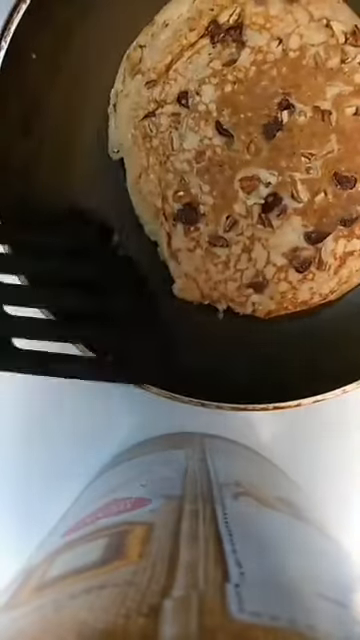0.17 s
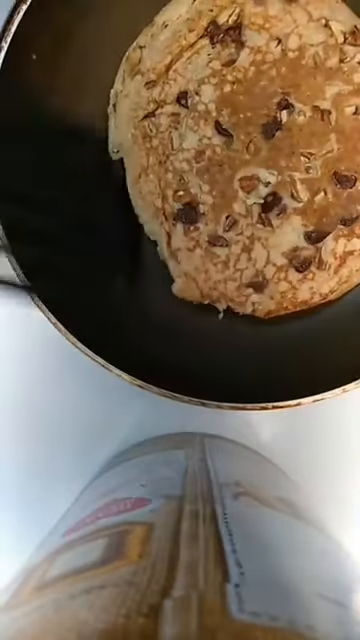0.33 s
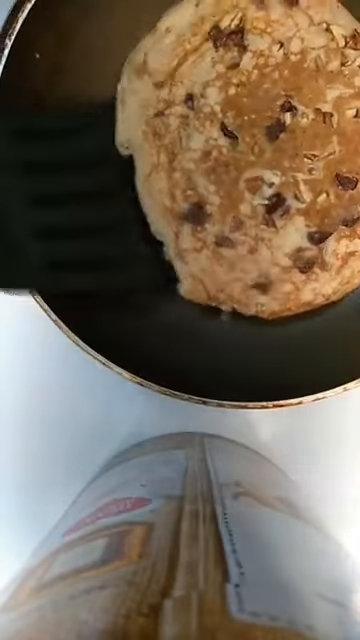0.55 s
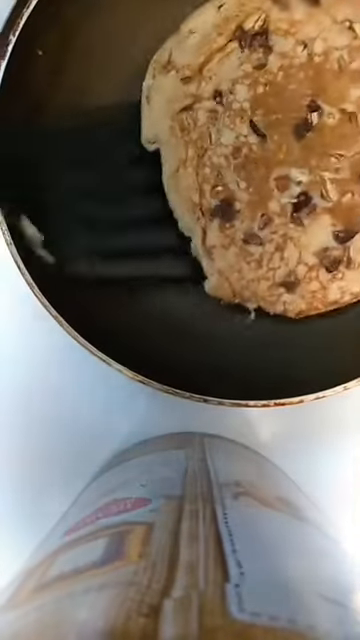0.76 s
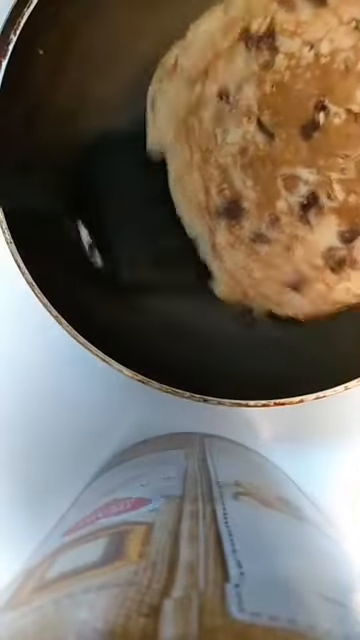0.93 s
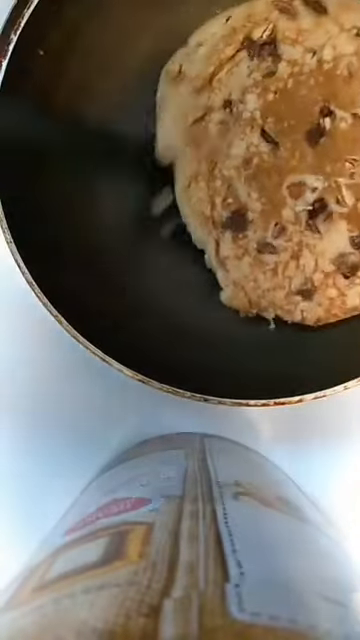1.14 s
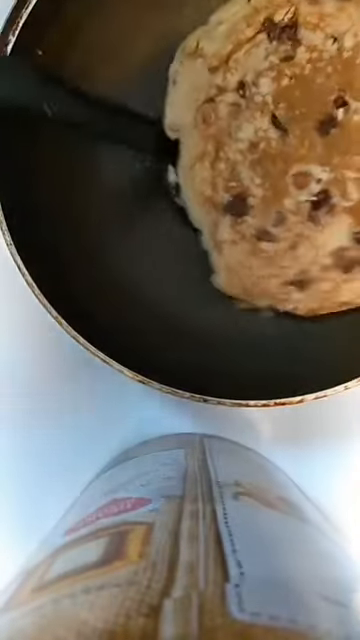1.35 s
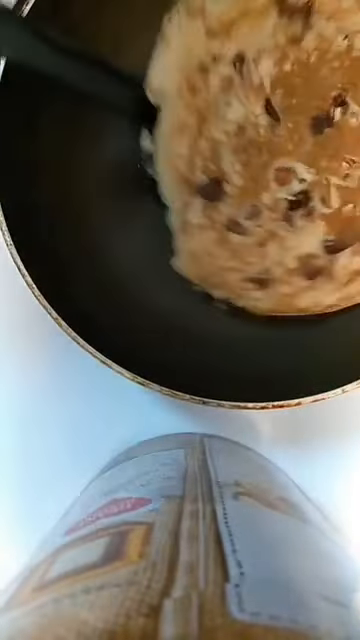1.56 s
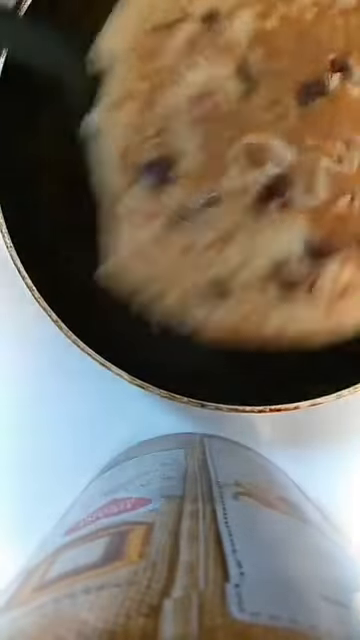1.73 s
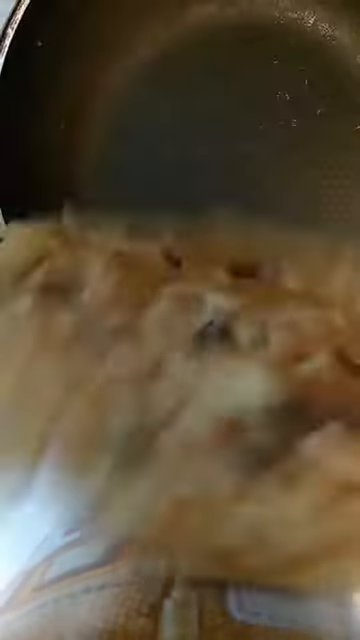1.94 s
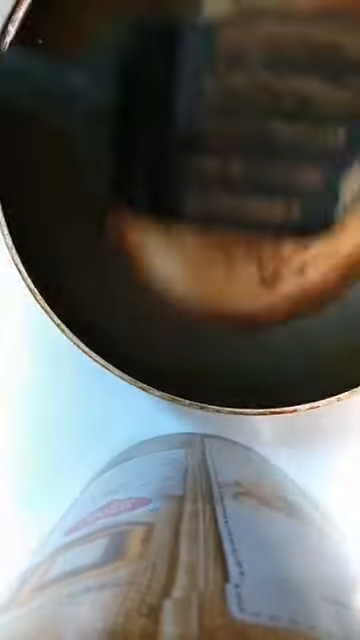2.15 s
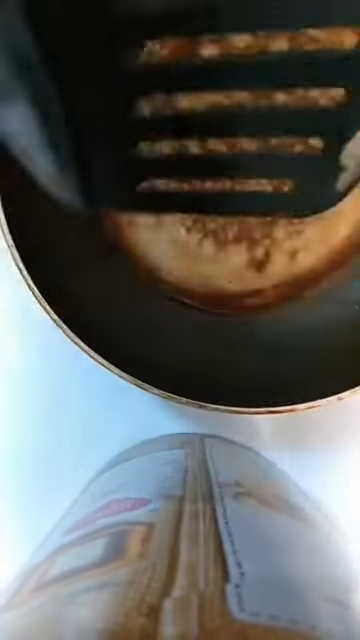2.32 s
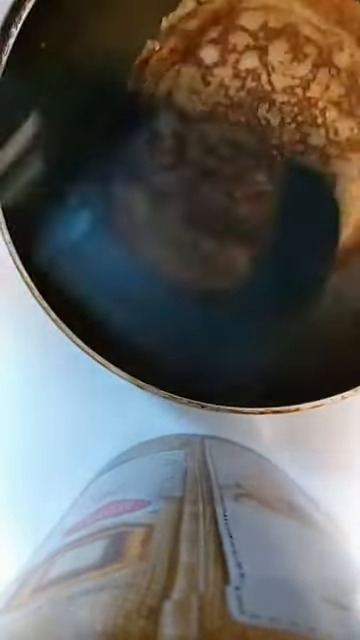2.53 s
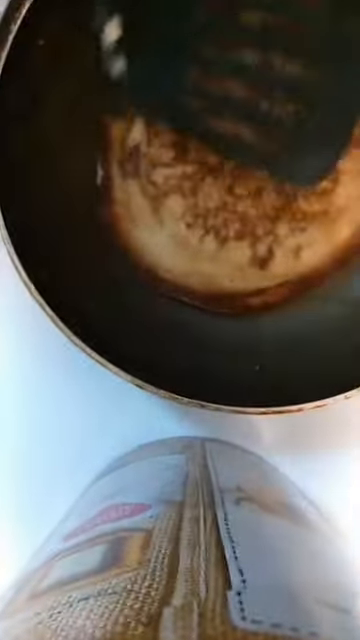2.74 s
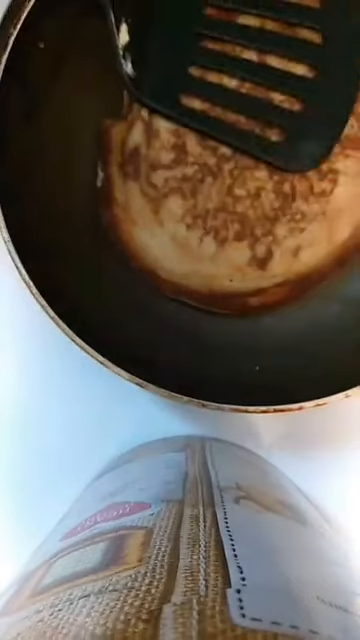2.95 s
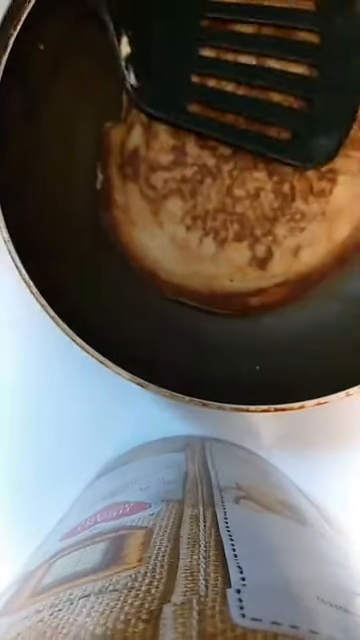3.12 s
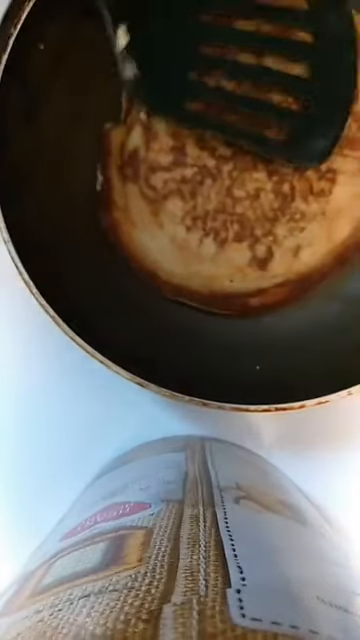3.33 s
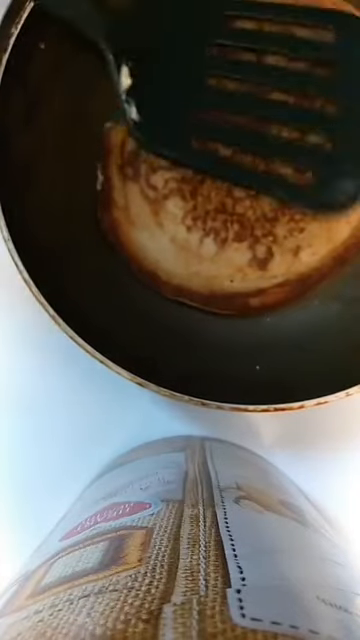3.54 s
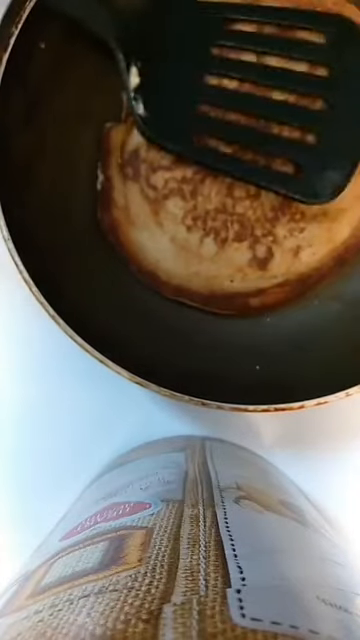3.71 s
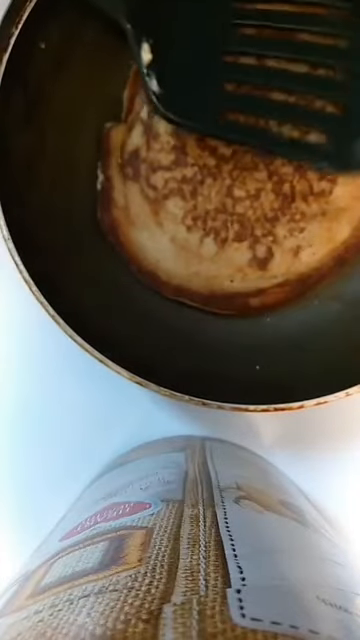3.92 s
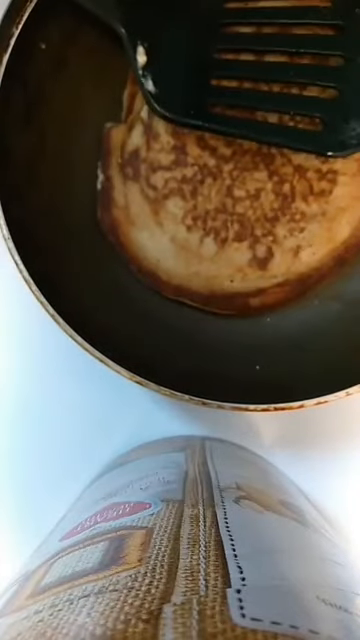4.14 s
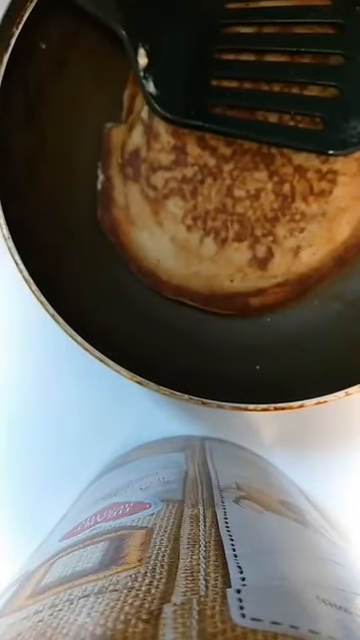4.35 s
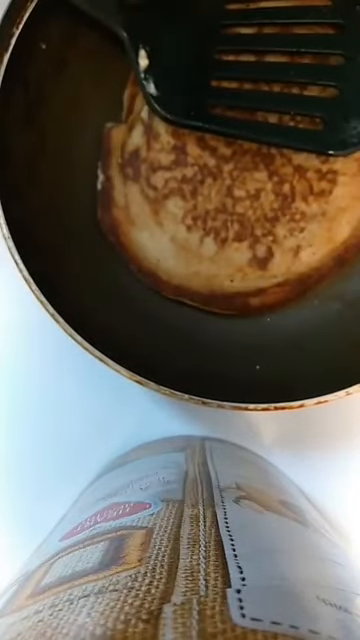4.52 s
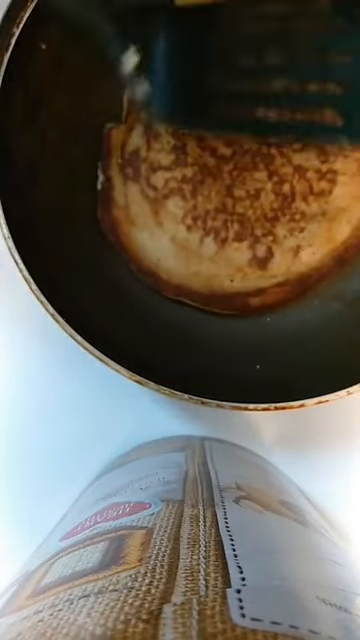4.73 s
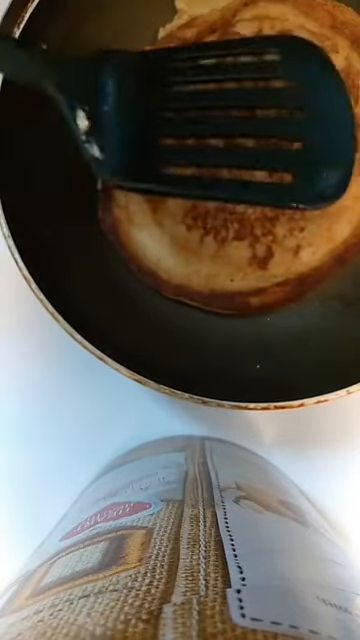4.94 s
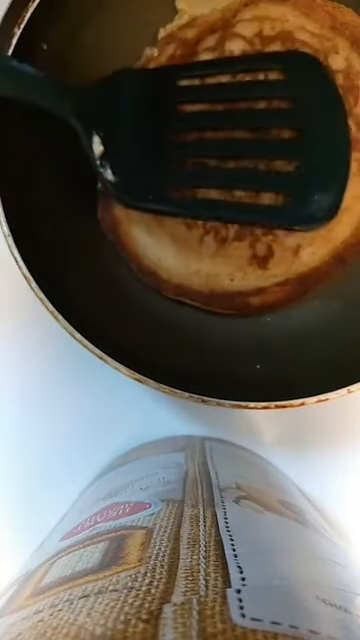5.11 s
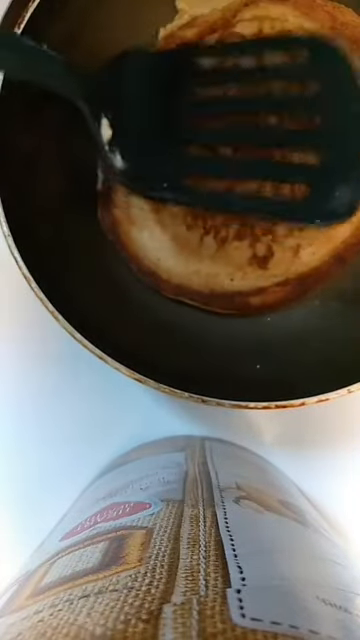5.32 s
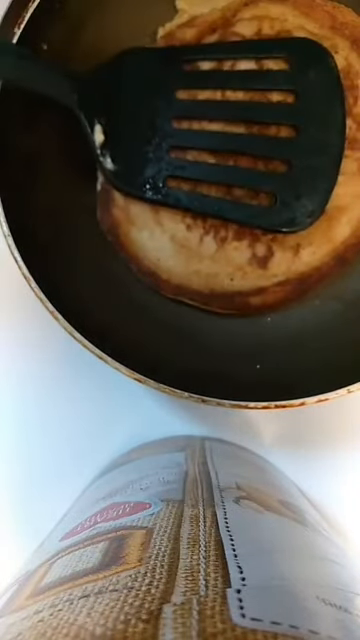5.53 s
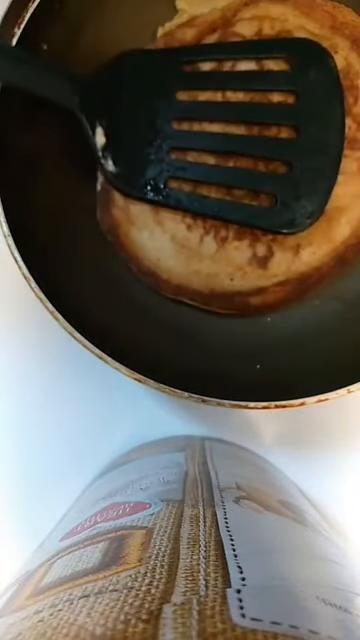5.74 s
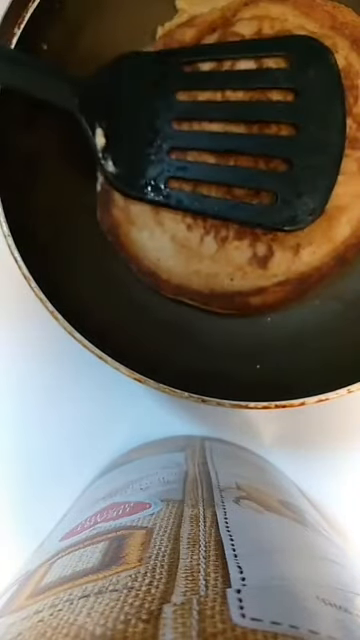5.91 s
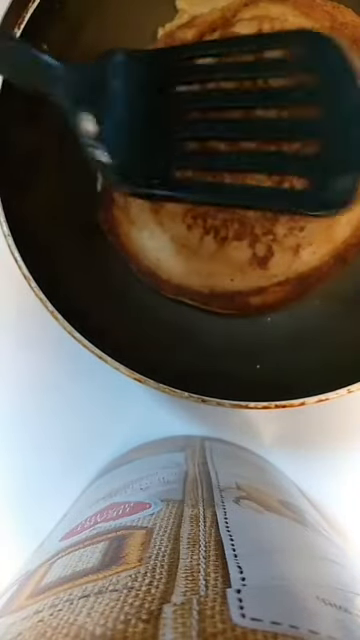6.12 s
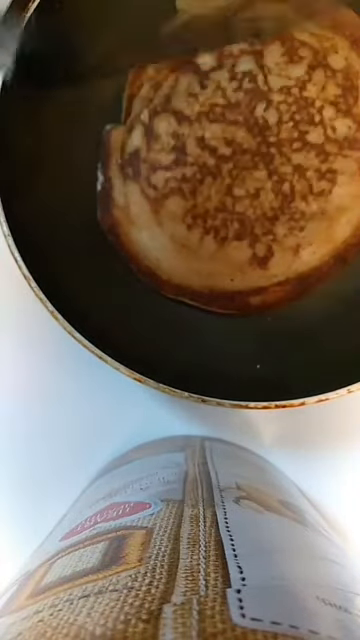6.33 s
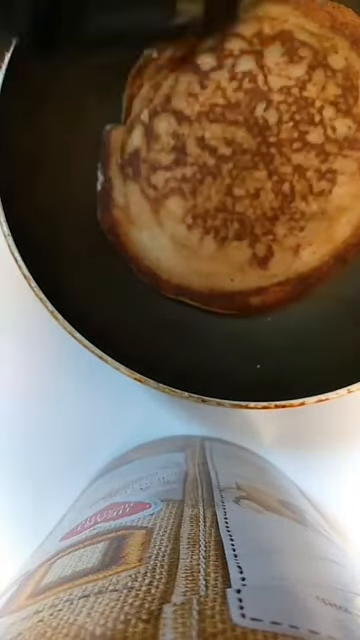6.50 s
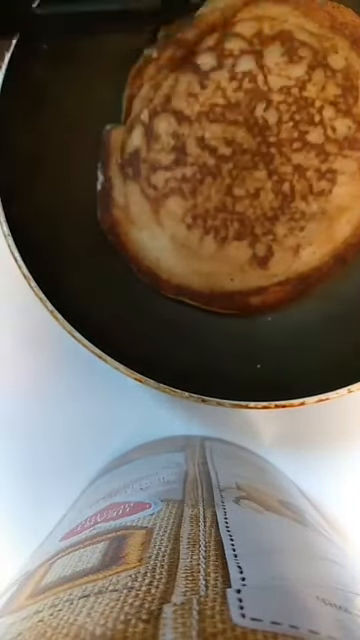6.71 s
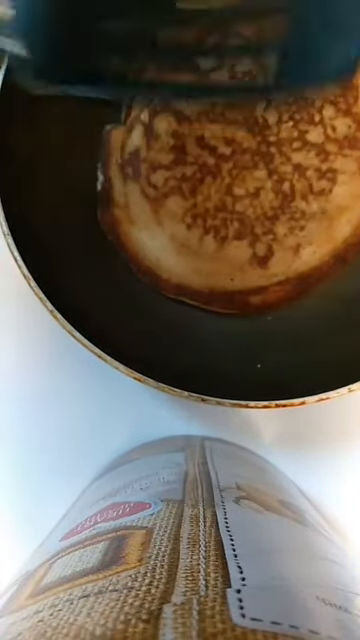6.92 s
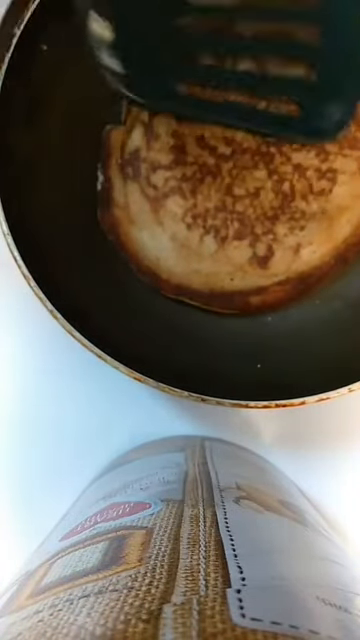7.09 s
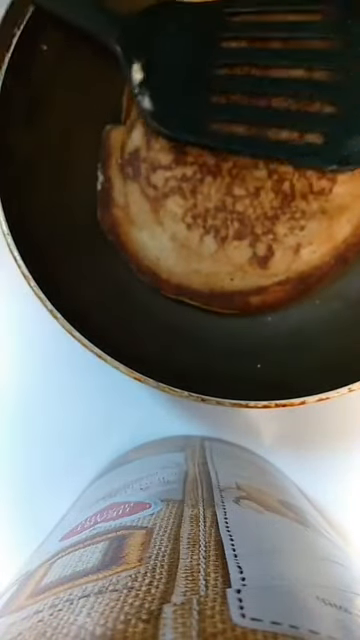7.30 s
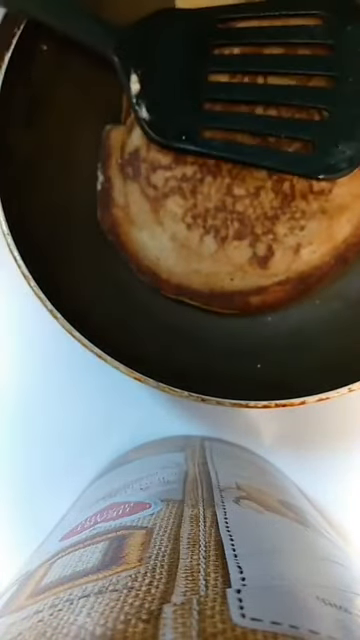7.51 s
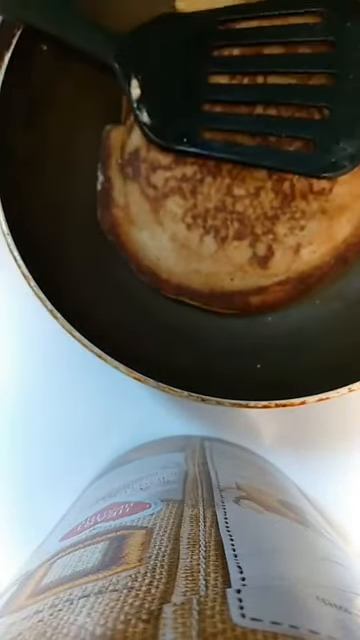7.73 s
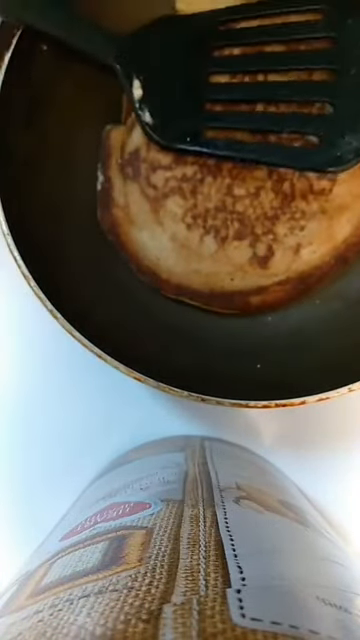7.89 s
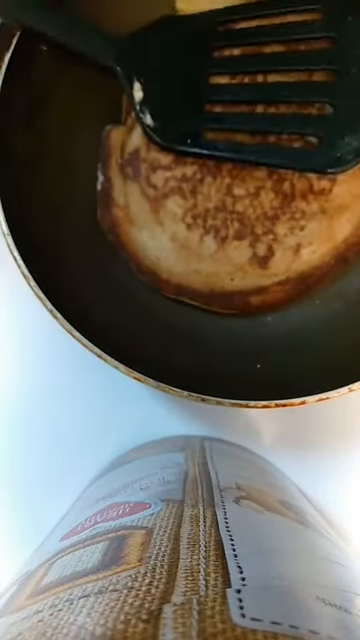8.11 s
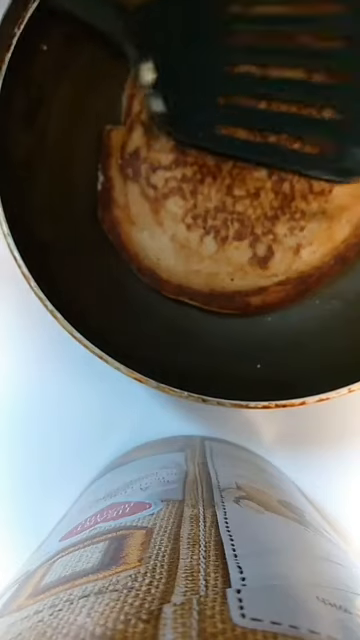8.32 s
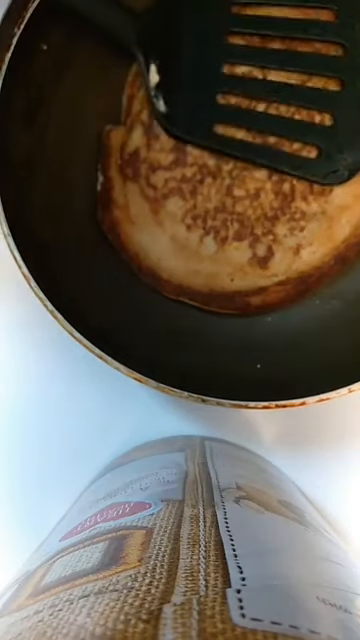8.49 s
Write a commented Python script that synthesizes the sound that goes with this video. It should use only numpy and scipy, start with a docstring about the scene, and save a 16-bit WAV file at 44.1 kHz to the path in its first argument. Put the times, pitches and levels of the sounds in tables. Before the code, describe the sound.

A small kitchen, heard close to a frying pan, with faint appliance hum, soft low rumble and a very short room tail. From 0 to 1.3 s a plastic blade scrapes in short rough strokes over thin, bright sizzling, with knocks at the start, near 0.25 and 0.7 s, and tiny squeaks near 0.2, 0.85 and 1.1 s. It quietens; a sharp spit at 1.5 s, a swelling scrape at 1.9 s and a quick chirp at 2.15 s lead to the flip. At 2.2 s several hard slaps and cracks bunch together with loud spatter, followed by smaller knocks until 2.5 s. Crisp pops and hissing stay busy, with a brief steam puff around 4 s. After 5 s the crackling thins to separate ticks, while soft, blurred woody bumps sound around 5.1, 5.8, 6.2, 6.7, 7.4 and 8.5 s.

```python
"""A plastic spatula slides under a pancake, flips it into a frying pan and presses it down in a small kitchen.
First the blade scrapes, squeaks and knocks: dense slips and rough blows drive the modes of the pan.
At 2.2 s come the hardest blows and loudest spits: clicks, pops and sprays of noise over the fizz of the fat.
A jet of steam at 4 s is band noise; from 5 s dull bumps ring across the room as blurred modes and clear notes.
Throughout, narrow noise bands make an appliance hum over a low, patchy rumble, and a short noise tail is the room."""
import sys
import numpy as np
from scipy import signal
from scipy.fft import rfft, irfft, next_fast_len
from scipy.io import wavfile

SR = 44100
rng = np.random.default_rng(int(sys.argv[2]) if len(sys.argv) > 2 else 0)


def put_to_file(sound):
    """Save the sound as 16-bit audio at rate SR, in the file named by the first command-line argument."""
    columns = np.atleast_2d(sound).T  # one column per channel
    safe = np.clip(columns, -1, 1)
    whole_steps = np.round(safe * 32767)
    wavfile.write(sys.argv[1], SR, whole_steps.astype(np.int16))


N = 377319

# Steady frying: time_s, fizz_db, steam_db
FRYING_LEVELS = [(0.0, -65.5, -77), (0.31, -58.5, -62.5), (0.62, -61, -70.5), (.95, -58.5, -63.5),
                 (1.12, -53.5, -57), (1.19, -55, -60.5), (1.25, -61, -66), (1.44, -57, -68.5),
                 (1.64, -66.5, -78.5), (1.95, -62.5, -80), (2.1, -58.5, -69), (2.21, -40, -38.5),
                 (2.31, -53, -56), (2.66, -57, -69), (2.97, -55, -60), (3.22, -54, -57.5),
                 (3.55, -60.5, -76), (3.86, -65.5, -70.5), (3.95, -50.5, -62), (4.12, -56, -62),
                 (4.26, -57.5, -64), (5.17, -61.5, -67.5), (5.6, -63.5, -72), (5.97, -57.5, -63.5),
                 (6.42, -63.5, -72.5), (6.82, -58.5, -71), (7.1, -64.5, -76), (8.05, -61, -70),
                 (8.556, -63.5, -77)]
# Spits of fat and water; the slow swells near 0.19 and 1.93 s are hiss of the scraping blade:
# peak_s, fizz_db, low_spray_db, rise_s
SPITS = [(.1396, -51, -80, .001), (0.187, -52, -55, 0.069), (0.431, -45, -80, 0.00089),
         (0.564, -44, -70, 0.0012), (0.968, -40.5, -60, .0024), (1.0913, -43, -58, .003),
         (1.2446, -56, -72, 0.0024), (1.306, -44, -56.5, 0.0032), (1.3673, -54, -75, .002),
         (1.471, -37.5, -59.5, .0024), (1.914, -44, -59, 0.055), (1.934, -43, -53.5, 0.054),
         (2.174, -60, -47, 0.11), (2.1865, -15, -28, 0.005), (2.198, -36, -48, 0.0035),
         (2.2147, -17, -24, 0.004), (2.2215, -31, -28.5, 0.0018), (2.2297, -22, -28.5, 0.0065),
         (2.243, -36, -51, .003), (2.28, -52, -63, .006), (2.309, -42, -38, 0.0053),
         (2.348, -64, -55, 0.0074), (2.4258, -30, -37.5, 0.019), (2.5041, -25, -48.5, 0.0041),
         (2.5815, -44, -62, .0015), (2.6064, -45, -62, 0.0035), (2.64, -46, -63, .002),
         (2.671, -42.5, -60, 0.0046), (2.7205, -50, -60, 0.035), (2.738, -38, -52.5, 0.0099),
         (2.7737, -37.5, -54, 0.0093), (2.812, -36.5, -50.5, 0.001), (2.816, -40, -56, 0.002),
         (2.855, -45, -70, .0011), (2.9023, -36, -53, .0016), (2.925, -47, -63, .005),
         (2.969, -37, -52.5, .001), (2.997, -42, -54, 0.02), (3.026, -40, -56, .0016),
         (3.043, -38, -56.5, .0026), (3.106, -34.5, -69, 0.0075), (3.1374, -39, -62, .0015),
         (3.1657, -42, -67, .0019), (3.195, -35, -60, .001), (3.1992, -33.5, -54, 0.0039),
         (3.229, -42, -79, .007), (3.273, -34.5, -56, 0.014), (3.3056, -24.5, -47.5, 0.0047),
         (3.342, -41, -56, .0013), (3.365, -40, -64, 0.039), (3.3784, -35, -56, 0.0068),
         (3.412, -44, -62, .0034), (3.474, -50, -65.5, .002), (3.502, -39, -67, .0025),
         (3.5334, -53, -76, .002), (3.583, -40.5, -68, 0.0051), (3.6596, -54, -82, .002),
         (3.738, -66, -78, 0.0019), (3.798, -42, -59, 0.0082), (3.93, -37, -54.5, 0.02),
         (3.9682, -55, -77, .0013), (4.027, -40, -52.5, 0.014), (4.124, -29, -64, 0.006),
         (4.156, -40, -52, .0023), (4.1954, -47, -72, .002), (4.225, -38, -53.5, 0.0082),
         (4.252, -35, -56, .0016), (4.283, -43, -52.5, 0.022), (4.294, -37, -62, .0024),
         (4.3735, -55, -83, .002), (4.433, -37.5, -54.5, 0.012), (4.497, -38, -54, .0031),
         (4.555, -42, -59.5, .0025), (4.619, -41.5, -59.5, .0046), (4.678, -31.5, -56, 0.0083),
         (4.703, -47, -56.5, .0017), (4.757, -49, -62, .0023), (4.818, -42, -62.5, 0.003),
         (4.9, -59, -64.5, 0.037), (4.94, -43, -66, 0.027), (5.069, -41.5, -53.5, 0.041),
         (5.342, -46, -69, .002), (5.354, -42, -53.5, 0.003), (5.384, -59, -68, 0.0086),
         (5.426, -43.5, -56.5, 0.002), (5.524, -47, -70.5, 0.0073), (5.654, -44, -74, .0013),
         (5.6835, -47, -63, .0014), (5.7427, -48, -68, 0.013), (5.8455, -49, -64, .0024),
         (5.928, -43, -76, .0036), (5.986, -47, -65, .0046), (6.085, -38, -57.5, 0.0065),
         (6.1745, -43, -100, 0.0018), (6.234, -44.5, -64, .002), (6.329, -48, -61, .016),
         (6.53, -45.5, -88, 0.0027), (6.634, -39, -75, .0016), (6.687, -47, -64, .0022),
         (6.758, -52, -72, .002), (6.822, -66, -70, .002), (6.886, -45, -68, .001),
         (6.942, -43, -69, 0.00086), (7.173, -46, -82, 0.0018), (7.253, -53, -75, 0.0023),
         (7.356, -36.5, -57, 0.0035), (7.389, -48, -58, 0.0063), (7.426, -44.5, -62, 0.0019),
         (7.6244, -38, -67, .0017), (7.664, -49, -84, 0.0061), (7.862, -33.5, -55, 0.0021),
         (7.8703, -46, -66, 0.001), (7.9556, -53, -72, 0.0016), (8.0377, -39.5, -62, 0.0018),
         (8.0437, -45, -58.5, 0.002), (8.321, -45, -70.5, 0.0013)]
# Jet of steam squeezed from under the pancake: time_s, level_db
STEAM_JET = [(3.908, -74), (3.926, -58.5), (3.966, -60), (3.98, -54), (4.032, -54.5), (4.15, -68)]
# Spectrum of the bubbles' fizz: frequency_hz, relative_db (per Hz)
FIZZ_SPECTRUM = [(2940, -42.5), (5000, -44), (6360, -20), (8300, -13.5), (10500, -1.5), (12500, 8),
                 (13300, 5), (14200, -5)]
# Spectrum of the steam hiss: frequency_hz, relative_db (per Hz)
STEAM_SPECTRUM = [(710, -18.5), (1200, -16), (3060, -9.5), (3380, -17.5), (4320, -5.5), (4840, -14.5),
                  (5230, -7.5), (7500, -3.5), (9750, -5), (16500, -120)]
# Spectrum of spray with large drops: frequency_hz, relative_db (per Hz)
HEAVY_SPRAY_SPECTRUM = [(590, -53), (1000, -19.5), (4430, -3), (4830, -4.5), (5360, -2), (8000, -12.5),
                        (10400, -14), (17600, -120)]
# Spectrum of spray with small drops: frequency_hz, relative_db (per Hz)
FINE_SPRAY_SPECTRUM = [(900, -27.5), (2000, -14.5), (3000, -10), (4600, -8.5), (6000, -3.5), (7800, -4.5),
                       (10000, -9), (17600, -120)]
# Blade resting and sliding lightly on the pan: time_s, rasp_db
LIGHT_SLIDE = [(0.0, -57.5), (0.43, -97), (0.61, -71.5), (0.9, -62.5), (1.05, -66), (1.28, -103),
               (1.4, -67.5), (1.62, -91)]
# Short scraping strokes: peak_s, rasp_db, ringing_db, thud_db, rise_s, hold_s, t60_s
STROKES = [(0.01, -62.5, -90, -53.5, 0.0086, 0.054, 0.054), (0.17, -62, -75, -56, 0.022, .005, 1),
           (0.237, -64.5, -66, -66.5, 0.042, 0.077, 0.64), (0.516, -63.5, -75, -63, 0.012, 0.018, 0.69),
           (0.637, -72, -53, -59.5, 0.046, 0.019, 0.063), (0.661, -52.5, -61, -57.5, 0.012, 0.036, 0.12),
           (0.722, -54, -80, -67, 0.006, 0.011, 0.1), (0.84, -54, -49.5, -56.5, 0.083, 0.032, 0.024),
           (1.106, -61, -66.5, -96, 0.071, 0.07, 0.3), (1.301, -57.5, -74, -54, 0.023, 0.0043, 0.22),
           (1.546, -71.5, -70, -71, 0.048, 0.031, 0.52), (1.898, -61, -60, -62.5, 0.017, 0.032, 0.085),
           (2.018, -74, -72.5, -66, 0.026, .02, 0.24), (2.121, -54, -67, -77.5, 0.005, 0.02, 0.24),
           (2.187, -37.5, -56.5, -37.5, 0.035, 0.01, 0.13), (2.216, -40, -71.5, -45, 0.017, 0.014, 0.75),
           (2.415, -49, -62, -53, 0.0097, 0.028, 0.1), (2.511, -57, -65, -57, 0.013, 0.0086, 0.12),
           (4.596, -70, -76, -65, 0.093, 0.032, 0.13), (4.666, -83, -87, -62.5, 0.041, .01, 0.1),
           (4.76, -97, -74, -69.5, 0.045, 0.14, 0.6)]
# Blade and pancake striking the pan: peak_s, ringing_db, crack_db, push_db, boom_hz
KNOCKS = [(0.018, -34.5, -64, -58, 138), (0.185, -60, -45.5, -24, 119), (0.25, -38.5, -55, -33, 123),
          (0.304, -52, -48.5, -35, 117), (0.668, -55, -53, -37, 65.2), (0.714, -31, -43.5, -31.5, 67),
          (1.3, -70, -51, -46, 54), (2.1855, -34, -34, -23, 250), (2.216, -34.5, -26, -18, 45.8),
          (2.234, -40.5, -27.5, -18, 132), (2.235, -44, -45, -19.5, 62), (2.31, -41, -35.5, -33, 64.6),
          (2.423, -46, -35.5, -47, 120), (2.519, -50, -41.5, -41, 109)]
# Modes of the pan: frequency_hz, width_hz, relative_db
PAN_MODES = [(137, 20, 0), (275, 45, 2), (455.5, 30, 1), (764.5, 5.1, 5.5), (966, 87, 0.5), (1355, 52, 4.5),
             (1530, 13, -4), (2018, 53, 7), (1790, 30, -5), (2340, 28, -8.5), (2874, 100, -1.5),
             (3410, 73, 4.5), (4080, 30, -3.5), (4280, 29, -0.5), (5000, 140, -10.5), (5900, 31, -11.5),
             (7000, 27, -11)]
# Spectrum of the rasp and the cracks: frequency_hz, relative_db (per Hz)
RASP_SPECTRUM = [(150, -33.5), (250, -3.5), (401, -2), (950, -1.5), (1500, -2.5), (4130, -8.5), (6200, -15),
                 (12400, -17), (14200, -24)]
# Blade edge sticking and slipping in step: start_s, length_s, pitch_hz, level_db, overtone_db
SQUEAKS = [(.004, 0.011, 920, -45.5, -60), (0.181, 0.0093, 933, -44.5, -73), (0.846, 0.03, 1032, -39, -68),
           (1.11, 0.018, 1044, -52.5, -80), (2.119, 0.011, 1085, -48.5, -67.5),
           (2.151, 0.0092, 1095, -32.5, -35)]
# Dull bumps across the room: strike_s, low_db, body_db, middle_db, high_db, base_t60_s,
# low_note_hz, low_note_db, high_note_hz, high_note_db
BUMPS = [(5.06, -51.5, -53, -50.5, -51, 0.45, 480, -54, 1890, -50.5),
         (5.244, -61, -77, -62, -61, 0.5, 534, -66, 2150, -60),
         (5.286, -61.5, -80, -74, -68, 0.26, 530, -64, 1900, -72),
         (5.777, -58.5, -63, -65, -64, 0.35, 449, -69, 1006, -78),
         (5.895, -66.5, -68.5, -69.5, -66, 0.97, 455, -68, 1010, -68),
         (6.216, -59, -60, -59, -61, 0.44, 450.5, -57, 1910, -67),
         (6.709, -59.5, -64, -61, -62, 0.86, 492, -57, 1890, -61),
         (6.998, -82, -77, -71, -73, 0.66, 800, -75, 2100, -73),
         (7.135, -89, -88, -71, -101, 0.16, 800, -89, 1960, -71.5),
         (7.24, -73, -73.5, -74, -89, 0.2, 800, -77, 1940, -74),
         (7.413, -55, -54.5, -61.5, -60.5, 0.46, 497, -49.5, 782, -57),
         (8.467, -56.5, -62.5, -61.5, -65.5, 0.7, 381.5, -54.5, 980, -60)]
# Modes that the bumps ring: frequency_hz, width_hz, relative_db
FURNITURE_MODES = [(470, 160, 1.5), (774, 41, 10), (1014, 26, 2.5), (1223, 34, -4), (1603, 140, -6),
                   (1840, 66, 2), (2156, 47, 2), (2590, 69, 1.5), (2897, 71, 3.5), (3440, 50, 1),
                   (4050, 110, -3.5), (4430, 24, 3)]
# Lines of the appliance hum: frequency_hz, width_hz (of each of two resonances), level_db
HUM_LINES = [(59, 9.4, -68.5), (124, 18, -81.5), (238.2, 9.4, -75), (289.7, 12, -71.5), (396, 42, -86.5),
             (446, 50, -85.5), (754, 35, -90.5), (2460, 70, -92.5)]
# Rumble: time_s, rumble_db, deepest_db
RUMBLE_LEVELS = [(0.0, -61.5, -55.5), (0.76, -61.5, -63), (0.93, -68, -66.5), (1.93, -72.5, -66.5),
                 (2.17, -63, -53), (2.36, -54, -63), (2.69, -64, -59.5), (3.07, -67, -64.5),
                 (3.81, -71, -70), (4.19, -64.5, -68), (4.53, -65.5, -64), (5.26, -62.5, -65),
                 (5.53, -71, -66), (6.07, -68.5, -65), (6.51, -74.5, -79), (6.96, -69.5, -66),
                 (7.17, -72.5, -78.5), (7.93, -68, -70), (8.32, -74.5, -77), (8.56, -62, -69)]
# Spectrum of the rumble: frequency_hz, relative_db (per Hz)
RUMBLE_SPECTRUM = [(15, -36), (25, -16.5), (64, 2), (189, -4), (289, -10.5), (344, -7), (649, -14),
                   (743, -13.5), (1110, -20.5), (2500, -36.5), (3250, -68), (5500, -120)]

FIZZ_FLUTTER_DB = 2
SMALL_SPITS, SMALL_SPIT_SPREAD_DB = 24, 8
SMALL_SPIT_DB, SMALL_SPIT_LOW_DB = 3, -26   # level over the fizz; lower part under that
SPIT_T60_S, SPIT_USUAL_DB, SPIT_HALVING_DB = 0.12, -44.5, 19   # t60 halves for each such step in level
POP_DB, POP_T60_S, SPRAY_DB = -2, 0.006, -8.5   # levels against the spit's
SNAP_DB, SNAP_HZ, SNAP_WIDTH_HZ, SNAP_RISE_S = 11, 11000, 6000, 0.003
CRACKLES_PER_S, CRACKLE_SPREAD_DB = 2200, 1.5
HEAVY_FROM_DB, HEAVY_SPAN_DB = -54, 12   # a stronger spray holds larger drops: lower and shorter
HEAVY_DECAY, FINE_DECAY = 0.36, 0.54   # share of the spit's t60
SPRAY_LAG_S, SPRAY_HOLD_S = 0.002, 0.0024   # the lower spray swells later
SEETHE_DB, SEETHE_T60_S = -20.5, 0.4   # against the lower spray: the fat seethes on
SLIPS_PER_S, SLIP_SPREAD_DB, SLIP_CLUMP_DB = 2000, 2, 1.6
SLIDE_RING_DB, SLIDE_THUD_DB = -5, -8.5   # against the rasp of the light slide
SING_HZ, SING_WIDTH_HZ = 1040, 100   # strongest mode; width of each of two resonances
RASP_MODES_DB, RASP_PATCHY_DB, PAN_SHIFT_DB = -1, 8, 3   # first is the share of the rasp that rings the pan
KNOCK_T60_S, KNOCK_RING_T60_S, KNOCK_RISE_S = 0.083, 0.1, 0.0007
BUMP_SHIFT_DB, BUMP_NOISE_DB = 1.5, -11
NOTE_RISE_S, NOTE_HOLD_S, NOTE_T60_S = 0.01, 0.004, 0.12
KITCHEN_T60_S, KITCHEN_DB = 0.15, -12
HUM_WAVER_DB, RUMBLE_WAVER_DB = 3.8, 1.2
BASS_EDGE_HZ, OVERLOAD = 42, 0.2   # bass corner; amplitude where peaks saturate
TREBLE_EDGE_HZ, TREBLE_REMAINDER_DB, CUTOFF_HZ = 14350, -30, 15300


def frying():
    """Superposition of random impulses: bubbles fizz in the treble, steam hisses lower, spits burst on top."""
    fizz_db, steam_db = in_time(FRYING_LEVELS)
    bed = amp(fizz_db + FIZZ_FLUTTER_DB * drift(40)) * colour(grains(5800, spread_db=-1.5), FIZZ_SPECTRUM)
    bed += amp(fizz_db - 11) * colour(grains(150, spread_db=3.5), FIZZ_SPECTRUM)   # lone small pops
    steam = colour(grains(8000, spread_db=0), STEAM_SPECTRUM)
    steam = patchy(steam, patchy_db=7, rate_hz=17, low_hz=784)
    bed += amp(steam_db + 0.85 * drift(11)) * steam
    jet_db, = in_time(STEAM_JET, outside=-120)
    bed += amp(jet_db) * band(grains(9000, spread_db=2), 2600, 5300)
    return bed + spits(np.hstack([np.transpose(SPITS), small_spits(fizz_db)]))


def spits(columns):
    """Sudden release: each spit is a click and a sharp pop, with a spray of smaller ones that dies away."""
    peak_s, peak_db, low_db, rise = columns
    t60 = SPIT_T60_S * 2 ** ((SPIT_USUAL_DB - peak_db) / SPIT_HALVING_DB)
    crackle = grains(CRACKLES_PER_S, spread_db=CRACKLE_SPREAD_DB)
    pop = colour(rng.choice([-1.0, 1.0], N), FIZZ_SPECTRUM)

    # The skin of the drop bursts in one click; slow rises barely snap.
    snap = np.zeros(N)
    snap[(peak_s * SR).astype(int)] = amp(peak_db + SNAP_DB) * np.minimum(SNAP_RISE_S / rise, 1)
    out = resonate(snap, SNAP_HZ, SNAP_WIDTH_HZ)
    out += bursts(peak_s, peak_db + POP_DB, POP_T60_S, 0.0012) * pop
    spray = bursts(peak_s, peak_db + SPRAY_DB, t60, rise)
    out += spray * amp(2.9 * drift(55)) * colour(crackle, FIZZ_SPECTRUM)

    # The lower spray divides its power between large and small drops.
    heavy = np.clip((low_db - HEAVY_FROM_DB) / HEAVY_SPAN_DB, 0.01, 0.99)
    drops = patchy(crackle, patchy_db=10.5, rate_hz=9.6, low_hz=782)
    flutter = amp(1.4 * drift(64))
    for share, decay, spectrum in [(heavy, HEAVY_DECAY, HEAVY_SPRAY_SPECTRUM),
                                   (1 - heavy, FINE_DECAY, FINE_SPRAY_SPECTRUM)]:
        db = low_db + 10 * np.log10(share)
        low = bursts(peak_s + SPRAY_LAG_S, db, t60 * decay, rise + SPRAY_LAG_S, SPRAY_HOLD_S)
        low += bursts(peak_s, db + SEETHE_DB, SEETHE_T60_S, 0.015)
        out += low * flutter * colour(drops, spectrum)
    return out


def small_spits(fizz_db):
    """Random process: faint spits at chance moments, stronger where the fizz is; columns as in SPITS."""
    when, size, slow = rng.random((SMALL_SPITS, 3)).T
    fizz_there_db = fizz_db[(when * (N - 1)).astype(int)]
    peak_db = fizz_there_db + SMALL_SPIT_DB + SMALL_SPIT_SPREAD_DB * (size - 0.5)
    return when * N / SR, peak_db, peak_db + SMALL_SPIT_LOW_DB, 0.001 + 0.006 * slow ** 2


def spatula():
    """Friction excitation: the dragged edge slips in dense clicks that ring the pan; strikes are added."""
    slide_db, = in_time(LIGHT_SLIDE, outside=-120)
    peak_s, rasp_db, sing_db, thud_db, rise, hold, t60 = np.transpose(STROKES)
    rasp = amp(slide_db) + bursts(peak_s, rasp_db, t60, rise, hold)
    sing = amp(slide_db + SLIDE_RING_DB) + bursts(peak_s, sing_db, t60, rise, hold)
    thud = amp(slide_db + SLIDE_THUD_DB) + bursts(peak_s, thud_db, t60, rise, hold)

    slips = grains(SLIPS_PER_S, spread_db=SLIP_SPREAD_DB) * amp(SLIP_CLUMP_DB * drift(70))
    out = sing * rms_one(resonate_twice(slips, SING_HZ, SING_WIDTH_HZ))
    out += rasp * amp(RASP_MODES_DB) * rms_one(modes(slips, PAN_MODES, shift_db=PAN_SHIFT_DB))
    out += rasp * patchy(colour(slips, RASP_SPECTRUM), patchy_db=RASP_PATCHY_DB, rate_hz=9.3, low_hz=733)
    low_modes = resonate(slips, 457, 74) - resonate(slips, 268, 60)
    dull_rub = amp(-2) * slips
    out += thud * band(low_modes + dull_rub, 70, 600)
    return out + knocks()


def knocks():
    """Impact excitation: a rough blow rings the pan and cracks; its push shakes the stove top."""
    peak_s, ring_db, crack_db, push_db, boom_hz = np.transpose(KNOCKS)
    rough = rms_one(grains(9000, spread_db=1))
    blow = bursts(peak_s, ring_db, KNOCK_RING_T60_S, KNOCK_RISE_S) * rough
    out = modes(blow, PAN_MODES, shift_db=2)
    out += bursts(peak_s, crack_db, KNOCK_T60_S, KNOCK_RISE_S) * colour(rough, RASP_SPECTRUM)
    for at, db, hz in zip(peak_s, push_db, boom_hz):
        push = bursts([at], db, 0.024, 0.0029)
        out += resonate(resonate(push, hz, 180), hz, 40)
    return out


def squeaks():
    """Stick-slip oscillation: short tones that start at once, waver a little and break off."""
    out = np.zeros(N)
    waver = 1 + 0.015 * drift(29)
    for start_s, length, hz, db, overtone_db in SQUEAKS:
        i = round(start_s * SR)
        t = np.arange(int((length + 0.02) * SR)) / SR
        phase = 2 * np.pi * np.cumsum(hz * waver[i:i + len(t)]) / SR
        shape = np.minimum(t / 0.0018, 1) * np.exp(-np.maximum(t - length, 0) / 0.0014)
        tone = amp(db) * np.sin(phase) + amp(overtone_db) * np.sin(1.92 * phase)
        out[i:i + len(t)] += shape * tone
    return out


def bumps():
    """Modal response at a distance: far blows arrive as blurred ringing, each with its own colour."""
    strike_s, low_db, body_db, mid_db, high_db, t60, *notes = np.transpose(BUMPS)
    low_hz, low_note_db, high_hz, high_note_db = notes
    noise = rng.standard_normal(N)
    blur = modes(noise, FURNITURE_MODES, shift_db=BUMP_SHIFT_DB) + amp(BUMP_NOISE_DB) * noise
    out = np.zeros(N)
    # lag_s, level_db, rise_s, from_hz, to_hz: the lows swell latest
    for lag, db, rise, from_hz, to_hz in [(0.0036, low_db, 0.013, 140, 520),
                                          (0.0013, body_db, 0.0038, 636, 1000),
                                          (0.00051, mid_db, 0.014, 1250, 2320),
                                          (0.0015, high_db, 0.0053, 2730, 5300)]:
        blow = bursts(strike_s + lag, db, t60 * 0.69, rise, 0.0036)
        room = bursts(strike_s + lag, db - 25, t60 * 2, rise)
        out += (blow + room) * band(blur, from_hz, to_hz)

    # Two wooden notes ring clear.
    t = np.arange(N) / SR
    for note_hz, note_db in [(low_hz, low_note_db), (high_hz, high_note_db)]:
        for at, hz, db in zip(strike_s, note_hz, note_db):
            envelope = bursts([at + NOTE_RISE_S], db, NOTE_T60_S, NOTE_RISE_S, NOTE_HOLD_S)
            out += envelope * np.sin(2 * np.pi * hz * t)
    return out


def kitchen(x):
    """Reverberation: a dull tail of exponentially decaying noise follows each sound."""
    t = np.arange(int(KITCHEN_T60_S * SR)) / SR
    dull_noise = signal.lfilter([1], [1, -0.5], rng.standard_normal(len(t)))
    tail = dull_noise * amp(-60 * t / KITCHEN_T60_S) * (t > 0.004)
    return amp(KITCHEN_DB) * signal.fftconvolve(x, tail / np.linalg.norm(tail))[:N]


def background():
    """Narrow-band noise: hum lines waver in level over a broad low rumble."""
    rumble = colour(rng.standard_normal(N), RUMBLE_SPECTRUM)
    rumble = patchy(rumble, patchy_db=13.5, rate_hz=5.4, low_hz=90.9)
    deep = band(band(rng.standard_normal(N), 38, 80), 38, 80)
    rumble_db, deep_db = in_time(RUMBLE_LEVELS)
    out = amp(rumble_db + RUMBLE_WAVER_DB * drift(7.4)) * rumble + amp(deep_db) * deep
    for hz, width, db in HUM_LINES:
        line = rms_one(resonate_twice(rng.standard_normal(N), hz, width))
        out += amp(db + HUM_WAVER_DB * drift(3.9)) * line
    return out


def modes(force, table, shift_db):
    """Modal sum, signs alternating; each mode's strength drifts slowly at random."""
    out = np.zeros(N)
    for k, (hz, width, db) in enumerate(table):
        out += (-1) ** k * resonate(amp(db + shift_db * drift(7.4)) * force, hz, width)
    return out


def resonate(x, hz, width_hz):
    """Simple resonance: a two-pole filter whose bandwidth sets its damping."""
    r = np.exp(-np.pi * max(width_hz, 1) / SR)
    zeros = np.array([1, 0, -1]) * (1 - r * r) / 2
    return signal.lfilter(zeros, [1, -2 * r * np.cos(2 * np.pi * hz / SR), r * r], x)


def resonate_twice(x, hz, width_hz):
    """Cascaded resonance: two equal filters give steeper skirts."""
    return resonate(resonate(x, hz, width_hz), hz, width_hz)


def grains(per_s, spread_db):
    """Random impulse train: sparse clicks of either sign, their levels spread exponentially."""
    level_db = max(spread_db, 0) * np.minimum(rng.exponential(1, N), 4)
    sizes = amp(level_db) * rng.choice([-1, 1], N)
    return sizes * (rng.random(N) < per_s / SR)


def bursts(peak_s, db, t60, rise_s, hold_s=0):
    """Exponential decay: envelopes rise fast to their peak, may hold, then fall 60 dB in t60."""
    out = np.zeros(N)
    for s, level_db, decay, rise, hold in np.broadcast(peak_s, db, t60, rise_s, hold_s):
        i = max(round((s - rise) * SR), 0)
        t = np.arange(min(int((decay + rise + hold) * SR), N - i)) / SR
        fall_db = 60 * np.maximum(t - rise - hold, 0) / decay
        out[i:i + len(t)] += amp(level_db - fall_db) * np.minimum(t / rise, 1) ** 2.2
    return out


def patchy(x, patchy_db, rate_hz, low_hz):
    """Band-wise modulation: fifth-octave bands each sink for a moment on their own."""
    edges = low_hz * 2 ** np.arange(0, 4.2, 1 / 5)
    out = np.zeros(N)
    for pair in zip(edges, edges[1:]):
        sos = signal.butter(2, pair, "band", fs=SR, output="sos")
        gain = amp(patchy_db * np.minimum(drift(rate_hz), 0.5))
        out += gain * signal.sosfiltfilt(sos, x)
    return rms_one(out)


def drift(rate_hz):
    """Low-pass filtered chance: a slow random curve of rms 1, drawn every 40 samples."""
    step = 40
    r = np.exp(-2 * np.pi * rate_hz * step / SR)
    slow = signal.lfilter([1], [1, -2 * r, r * r], rng.standard_normal(N // step + 2002))
    slow = slow[2000:]   # leave out the filter's settling
    return np.interp(np.arange(N) / step, np.arange(len(slow)), rms_one(slow))


def colour(x, spectrum):
    """Spectral shaping: weight each frequency by a curve on a log axis; rms 1."""
    size = next_fast_len(N)
    hz, db = np.transpose(spectrum)
    bin_hz = np.arange(size // 2 + 1) * SR / size
    gain = amp(np.interp(np.log(bin_hz + 1), np.log(hz), db, left=-90))
    return rms_one(irfft(rfft(x, size) * gain, size)[:N])


def band(x, low_hz, high_hz):
    """Band-pass filtering: keep one range of frequencies; rms 1."""
    sos = signal.butter(2, [low_hz, high_hz], "band", fs=SR, output="sos")
    return rms_one(signal.sosfilt(sos, x))


def in_time(rows, outside=None):
    """Linear interpolation: the columns of a curve, one value a sample."""
    s, *columns = np.transpose(rows)
    return [np.interp(np.arange(N) / SR, s, c, outside, outside) for c in columns]


def rms_one(x):
    """Normalization: scale to unit effective value."""
    return x / np.sqrt(np.mean(x ** 2) + 1e-20)


def amp(db):
    """Decibel law: the amplitude ratio of a level."""
    return 10 ** (np.asarray(db) / 20)


def scene():
    """Superposition: near sounds and their room tail, far bumps and the background."""
    near = frying() + spatula() + squeaks()
    return (near + kitchen(near) + bumps() + background())[None]


def record(dry):
    """Band limits and saturation: bass is lost, peaks are rounded, the treble drops steeply, then is cut."""
    dry = signal.sosfilt(signal.butter(2, BASS_EDGE_HZ, "high", fs=SR, output="sos"), dry)
    dry = OVERLOAD * np.tanh(dry / OVERLOAD)
    # The treble drops steeply above 14 kHz; a faint remainder reaches up to the cutoff.
    low = signal.sosfilt(signal.cheby2(14, 50, TREBLE_EDGE_HZ, fs=SR, output="sos"), dry)
    cut = signal.cheby2(14, 70, CUTOFF_HZ, fs=SR, output="sos")
    return signal.sosfilt(cut, low + amp(TREBLE_REMAINDER_DB) * dry)


dry = scene()
out = record(dry)
put_to_file(out)
```